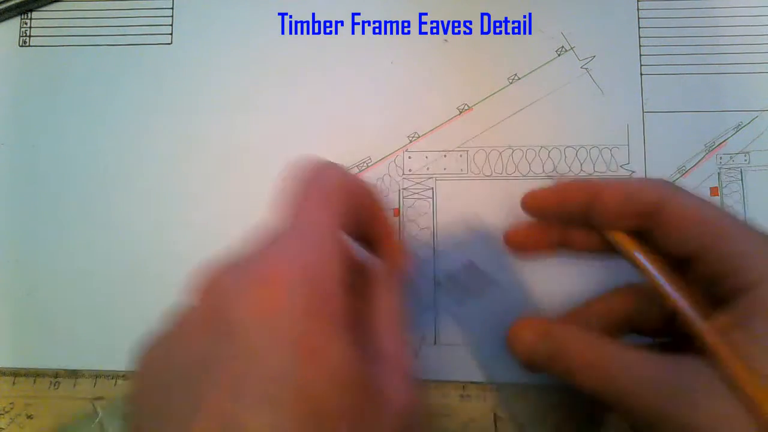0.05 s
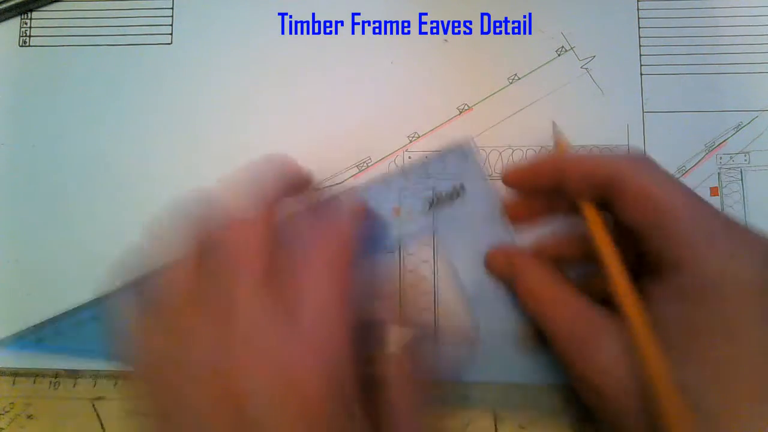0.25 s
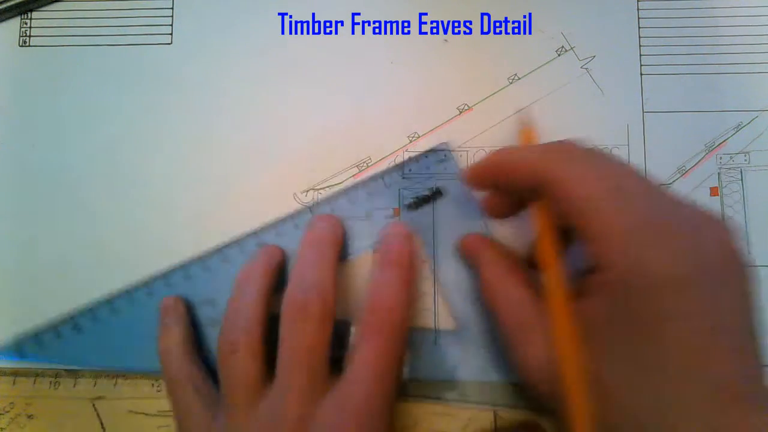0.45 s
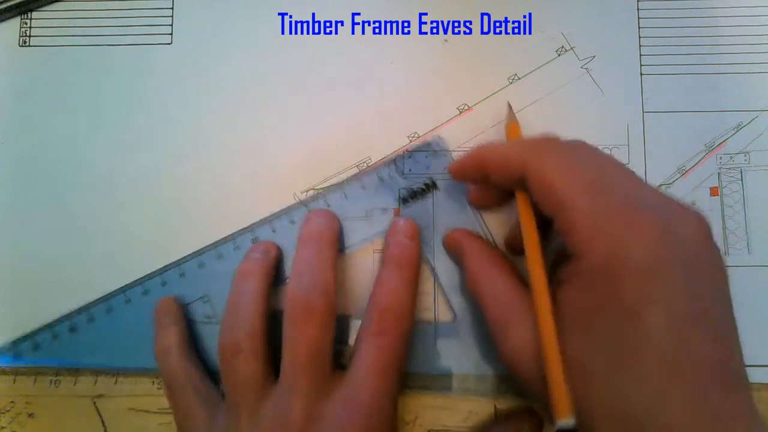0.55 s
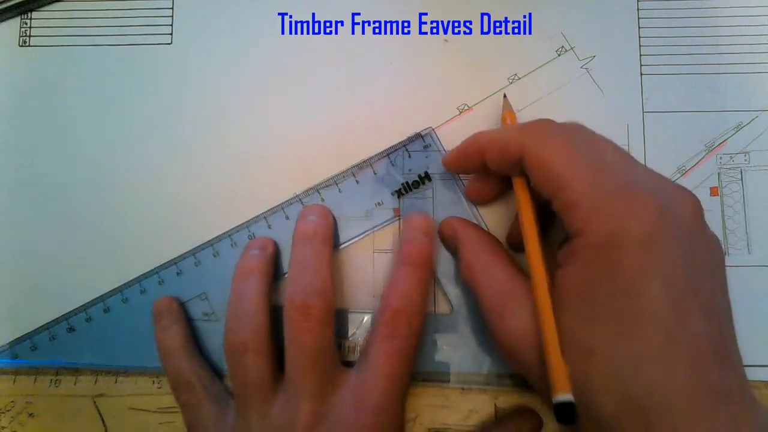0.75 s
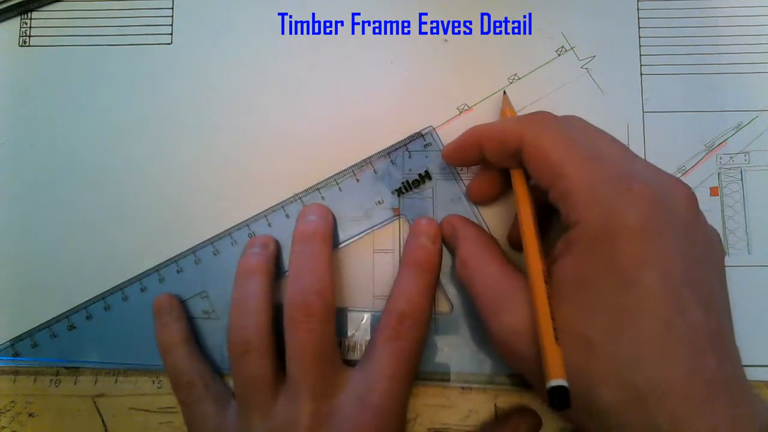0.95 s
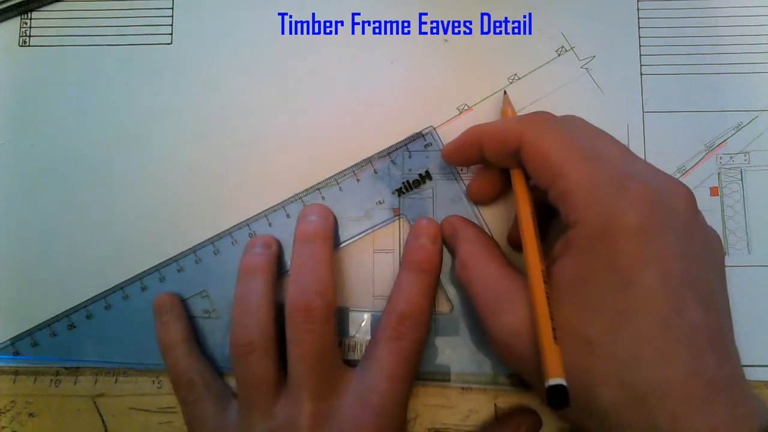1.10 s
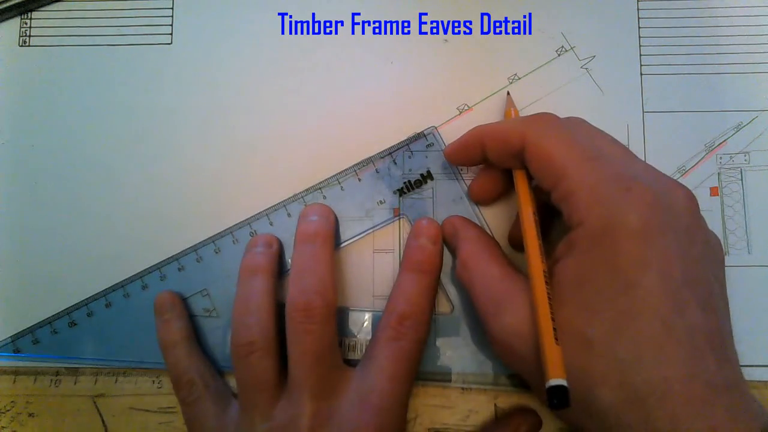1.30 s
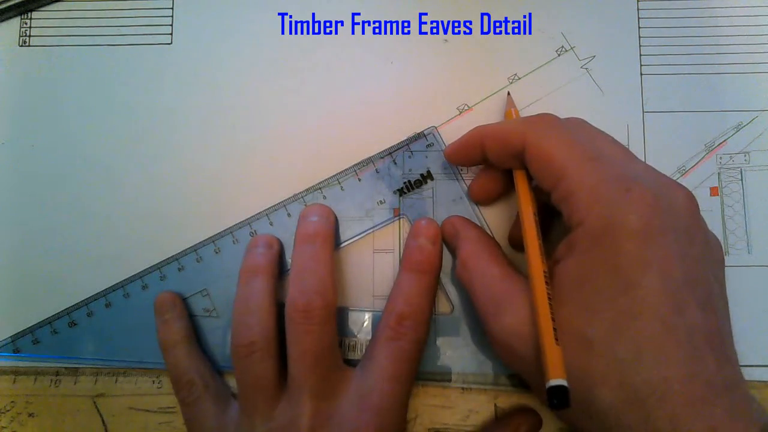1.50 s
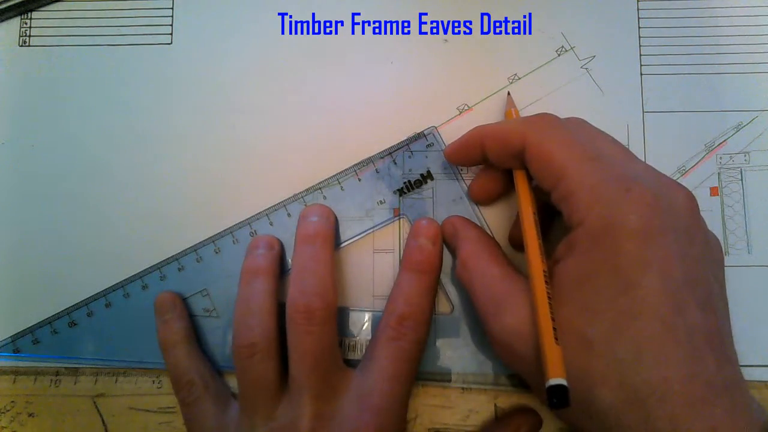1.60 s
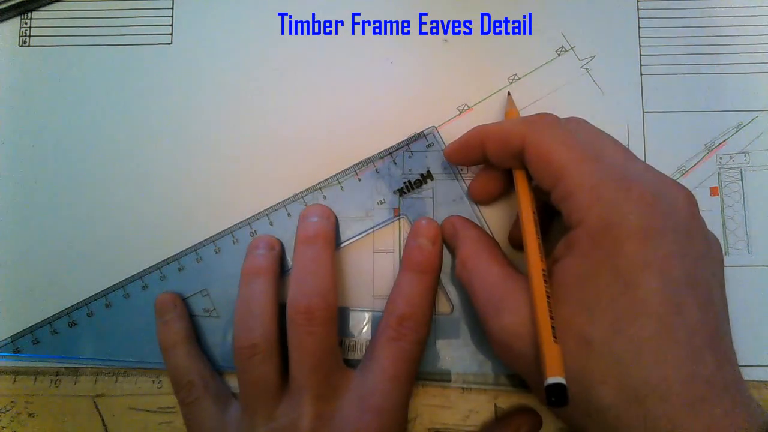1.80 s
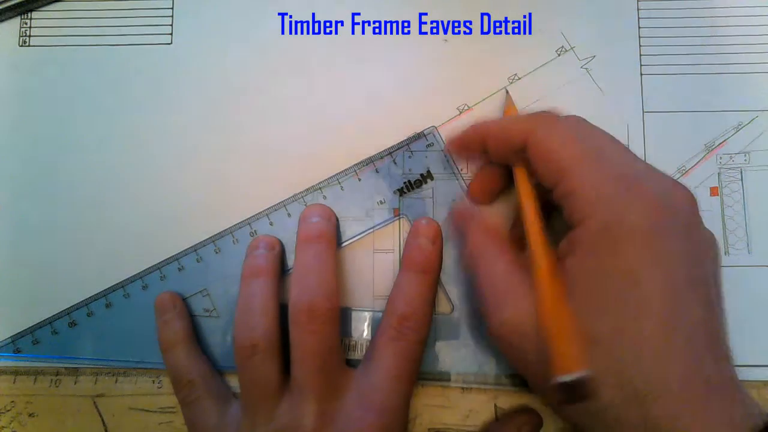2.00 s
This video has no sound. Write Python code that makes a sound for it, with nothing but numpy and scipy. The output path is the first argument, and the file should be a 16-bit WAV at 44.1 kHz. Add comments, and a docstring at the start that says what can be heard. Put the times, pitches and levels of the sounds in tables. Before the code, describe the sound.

A hard plastic set square slides over paper and clatters onto a drawing board.

```python
"""A hard plastic set square slides over paper, close to the microphone, at a drawing board in a small room.
It knocks twice against the straightedge and drops flat: each contact cracks and rings the thin plate,
the board thuds and the room answers. Hands then brush the paper over the faint hum of a fan.
Now and then the sound cuts out for a hundredth of a second."""
import sys
import numpy as np
from scipy import signal
from scipy.fft import rfft, irfft
from scipy.io import wavfile
from scipy.ndimage import uniform_filter1d

SR = 44100
rng = np.random.default_rng(int(sys.argv[2]) if len(sys.argv) > 2 else 0)


def bounce(signal):
    """Save signal as a 16-bit WAV file at the path given by the first command-line argument."""
    frames = np.transpose(np.atleast_2d(signal))
    limited = np.clip(frames, -1, 1)
    pcm = np.round(limited * 32767).astype(np.int16)
    wavfile.write(sys.argv[1], SR, pcm)


N = 90404
T = np.arange(N) / SR
FREQS = np.fft.rfftfreq(N, 1 / SR)

# Contacts of the set square. Each row: start in seconds, crack in dB, plate ring in dB, board thud in dB,
# crack tilt in dB per octave, chatter in seconds, edge snap in dB, ring tilt in dB per octave.
CONTACTS = [(0.2217, -14.5, -9.5, -46, -1.45, 0.0048, -12.5, 0),
            (0.2309, -23, -27, -47.5, -0.5, 0.0036, -39, -6.5),
            (0.284, -14, -13, -41.5, 1.5, 0.0041, -10, 7.5),
            (0.2915, -20, -30.5, -38.5, -5.5, .001, -33, 0.5),
            (0.4029, -11.5, -30, -35, -0.84, 0.0068, -38, 1),
            (0.4135, -14.5, -33, -45, -4, 0.0019, -31, 0.5),
            (0.4358, -16.5, -30.5, -37.5, -1.5, 0.0052, -33.5, 0),
            (0.453, -24.5, -33.5, -46.5, 0.5, 0.006, -32, 2.5)]
PIVOT_HZ = 5000  # the pitch that a tilt leaves alone


def undb(db):
    """Decibels to gain."""
    return 10 ** (np.asarray(db) / 20)


def unit_rms(x):
    """Scale to an rms of one."""
    return x / np.sqrt(np.mean(x ** 2))


def at_hz(points, hz):
    """Read (Hz, value) points on a log-frequency axis."""
    freqs, values = np.array(points, float).T
    return np.interp(np.log(np.maximum(hz, 1)), np.log(freqs), values)


def noise(colour, tilt_db=0):
    """Noise shaped by (Hz, dB) points and tilted by tilt_db per octave above 1 kHz."""
    db = at_hz(colour, FREQS) + tilt_db * np.log2(np.maximum(FREQS, 1000) / PIVOT_HZ)
    return unit_rms(irfft(rfft(rng.standard_normal(N)) * undb(db), N))


def resonance(hz, width_hz):
    """Noise ringing in one resonance."""
    peak = 1 / (1 + (2 * (FREQS - hz) / width_hz) ** 2)
    return unit_rms(irfft(rfft(rng.standard_normal(N)) * peak, N))


def wander(seconds):
    """Random drift with an rms of one, smoothed over the given time."""
    span = max(int(seconds * SR), 1)
    smoothed = uniform_filter1d(rng.standard_normal(N), span, mode="wrap")
    return unit_rms(uniform_filter1d(smoothed, span, mode="wrap"))


def strike(start, rise, hold, t60):
    """Envelope with a linear rise and an exponential release from start + hold, all in seconds."""
    age = T - start
    return np.clip(age / rise, 0, 1) * np.exp(-np.log(1000) * np.maximum(age - hold, 0) / t60)


def ring(modes, start, rise):
    """Damped modes set going at one moment, each in a random phase."""
    return sum(undb(db) * strike(start, rise, 0, t60) * np.sin(2 * np.pi * (hz * T + rng.random()))
               for hz, db, t60 in modes)


def fan_and_air():
    """Behind everything, a fan's wavering tones over the hiss of the quiet room."""
    # Fan tones. Each row: pitch in Hz, rms level in dB.
    tones = [(53.8, -73), (91.5, -68.5), (145.3, -70.5), (191.7, -75), (240.5, -68), (382.5, -80.5),
             (479, -79.5), (610, -84.5), (768, -84), (910, -78.5), (958, -78)]
    # Colour of the hiss. Each row: frequency in Hz, relative density in dB.
    air_colour = [(20, -2.5), (50, 3), (110, -5.5), (250, -7.5), (330, -11.5), (600, -13), (750, -15),
                  (930, -11), (1250, -17), (2500, -18), (5000, -24.5), (8500, -27), (11000, -35.5),
                  (14500, -55.5)]
    # Course of the hiss. Each row: time in seconds, rms level in dB.
    air_level = [(0, -58.5), (.2, -63), (.8, -62.5), (1.5, -60.5), (2.05, -61)]
    hum = 0
    for hz, db in tones:
        phase = 2 * np.pi * (hz * T + rng.random()) + .35 * wander(seconds=.11)
        hum += undb(db) * np.sqrt(2) * np.sin(phase)
    air_db = np.interp(T, *np.array(air_level).T)
    return hum + noise(air_colour) * undb(air_db)


def room(near):
    """The small room's diffuse answer to the close sounds, dying a little sooner in the treble."""
    # Decay of the room. Each row: frequency in Hz, t60 in seconds.
    decay = [(200, 0.36), (1500, 0.31), (4000, 0.3283), (8000, 0.2926), (11000, 0.33), (14000, 0.31)]
    # Colour of its answer. Each row: frequency in Hz, relative level in dB.
    colour = [(150, 8.5), (500, 5), (2000, -1), (3000, 2.5), (4500, -1.5), (8000, -4.5), (11000, -5.5),
              (14000, -3)]
    white = rfft(rng.standard_normal(N))
    centres = np.geomspace(125, 14000, 11)
    tail = 0
    for hz, weights in zip(centres, np.eye(len(centres))):
        band = irfft(white * at_hz(list(zip(centres, weights)), FREQS), N)
        envelope = strike(start=.0054, rise=.0057, hold=0, t60=at_hz(decay, hz))
        tail += band * undb(at_hz(colour, hz)) * envelope
    return undb(-5) * signal.fftconvolve(near, tail / np.linalg.norm(tail))[:N]


def hands():
    """Soft presses and short rubs as the fingers settle on the board."""
    # Each row: start in seconds, level in dB, pitch in Hz, hold in seconds.
    presses = [(.66, -60, 109.5, .04), (1.356, -66, 350.5, .035), (1.568, -65.5, 3805, .02),
               (1.583, -57.5, 130, 0.021), (1.885, -68, 1587, 0.042), (1.98, -60, 109.7, 0.096)]
    return sum(undb(db) * resonance(hz, width_hz=.46 * hz) * strike(start, rise=.008, hold=hold, t60=.13)
               for start, db, hz, hold in presses)


def ticks():
    """Light touches of plastic and pencil, each a short pitched ring with one overtone."""
    # Each row: start in seconds, level in dB, pitch in Hz.
    touches = [(0.0326, -46.5, 4660), (.152, -51, 10610), (1.966, -62.5, 4480)]
    out = 0
    for start, db, hz in touches:
        tone = resonance(hz, width_hz=.08 * hz)
        overtone = undb(-9) * resonance(1.53 * hz, width_hz=.16 * hz)
        out += undb(db) * (tone + overtone) * strike(start, rise=.00125, hold=.0025, t60=.012)
    return out


def slides():
    """Plastic and skin rub the paper with a grainy swell that sings faintly in the plate."""
    # Strokes over the paper. Each row: start, peak and end in seconds, level in dB.
    strokes = [(.01, 0.049, 0.083, -67.5), (0.074, 0.141, 0.26, -55.5), (.67, 0.704, .84, -77),
               (1.94, 1.988, 2.1, -65)]
    # Colour of rubbed paper. Each row: frequency in Hz, relative density in dB.
    paper = [(300, -10), (1200, -5.5), (3000, -6), (6000, 0), (8000, 3), (11300, -1), (14000, -22.5)]
    # Resonances of the rubbed plastic. Each row: pitch in Hz, width in Hz, level against the paper in dB.
    plastic = [(2000, 170, -9.5), (4700, 400, -8)]
    swell = sum(undb(db) * np.interp(T, [start, peak, end], [0, 1, 0])
                for start, peak, end, db in strokes)
    rub = noise(paper) + sum(undb(db) * resonance(hz, width) for hz, width, db in plastic)
    grain_db = 3.5 * wander(seconds=.0027)
    return swell * rub * undb(grain_db)


def board():
    """The drawing board thuds in its low modes under each contact."""
    # Each row: pitch in Hz, relative level in dB, t60 in seconds.
    modes = [(51.3, -8.5, 0.37), (91, 0, .38), (128.5, -7, .28), (155.5, -6.5, 0.37), (360, -12, 0.13),
             (469, -3.5, 0.16)]
    return sum(undb(thud_db) * ring(modes, start, rise=.017) for start, _, _, thud_db, *_ in CONTACTS)


def set_square():
    """Each contact snaps, chatters and rings the plate; the spot struck favours low or high modes."""
    # Modes of the thin plate. Each row: pitch in Hz, relative level in dB, t60 in seconds.
    plate_modes = [(969, -14, .07), (2265, -7, 0.08), (3216, -15.5, .15), (4170, -7.5, .07),
                   (5516, -2, .06), (6250, -14, 0.1), (6780, -6, 0.078), (7015, -1, 0.12),
                   (7450, -7.5, 0.087), (7570, -3.5, .12), (8120, -3.5, 0.057), (8365, 0, .08),
                   (9103, -12.5, .05), (9600, -6, .05)]
    # Colours of the hard edge's first snap and of the crack. Each row: frequency in Hz, density in dB.
    snap_colour = [(2000, -24.5), (6000, -14), (7500, -2), (10500, 0), (12300, -9), (13500, -13),
                   (14600, -27)]
    crack_colour = [(120, -30.5), (450, -17.5), (750, -16.5), (1150, -14), (1500, -4.5), (2300, -3),
                    (2900, -3), (4000, 0.5), (6200, 0.5), (7800, -1), (9200, 0), (10500, -8.5),
                    (12000, -13.5), (13500, -21), (14600, -32.5)]
    after_ring = undb(-4)  # ring left once the chatter has died
    out = 0
    for start, crack_db, ring_db, _, crack_tilt, chatter_s, snap_db, ring_tilt in CONTACTS:
        modes = [(hz, db + ring_tilt * np.log2(hz / PIVOT_HZ), t60) for hz, db, t60 in plate_modes]
        chatter = strike(start, rise=.0003, hold=chatter_s, t60=.041)
        snap = undb(snap_db) * noise(snap_colour) * strike(start, rise=.0003, hold=.0012, t60=.014)
        crack = undb(crack_db) * noise(crack_colour, crack_tilt) * chatter
        plate = undb(ring_db) / 2 * ring(modes, start, rise=.0008) * (after_ring + chatter)
        out += snap + crack + plate
    return out


def scene():
    """One microphone by the board: close plastic and paper, their room, thuds, hands and the fan."""
    near = set_square() + ticks() + slides()
    return (near + room(near) + board() + hands() + fan_and_air())[None]


def record(dry):
    """The microphone clips the sharpest peaks, drops out briefly and cuts the top."""
    # Each entry: start of a dropout in seconds.
    dropouts = [.0703, 1.0556, 1.2079, 1.3198, 1.3503, 1.391, 1.584, 1.787, 1.8683]
    dropout_s, dropout_db, top_hz = .0096, -27, 14600
    gain = np.ones(N)
    for start in dropouts:
        gain[(T >= start) & (T < start + dropout_s)] = undb(dropout_db)
    lowpass = signal.ellip(10, .2, 80, top_hz, fs=SR, output="sos")
    return signal.sosfilt(lowpass, np.clip(dry, -.9, .9) * gain)


dry = scene()
out = record(dry)
bounce(out)
```